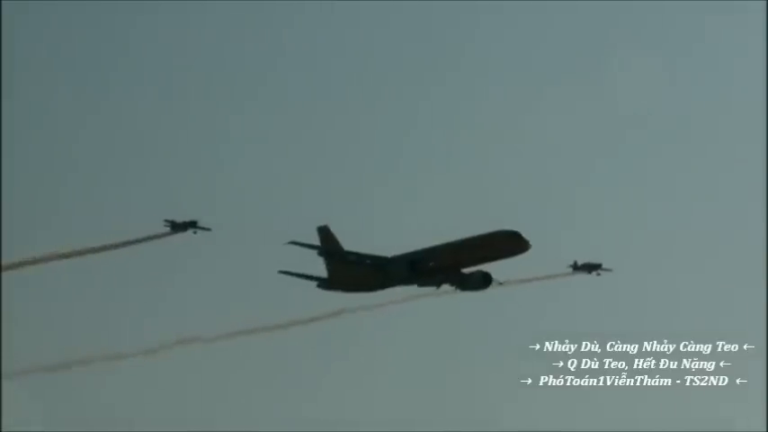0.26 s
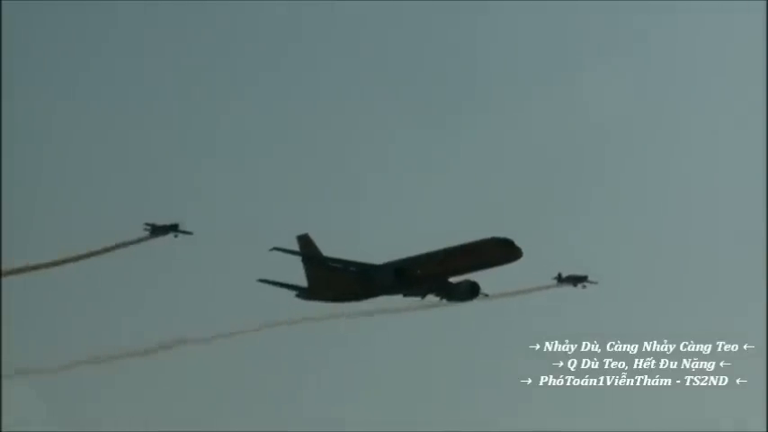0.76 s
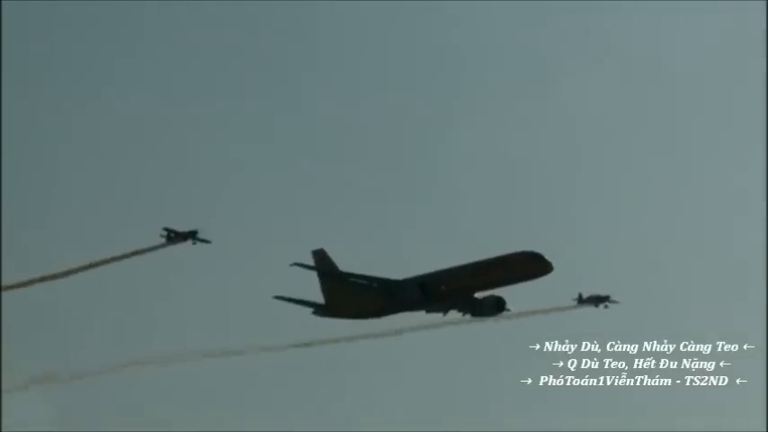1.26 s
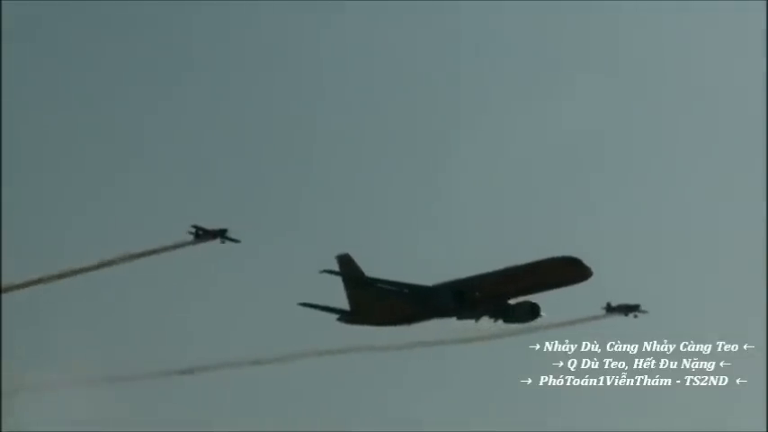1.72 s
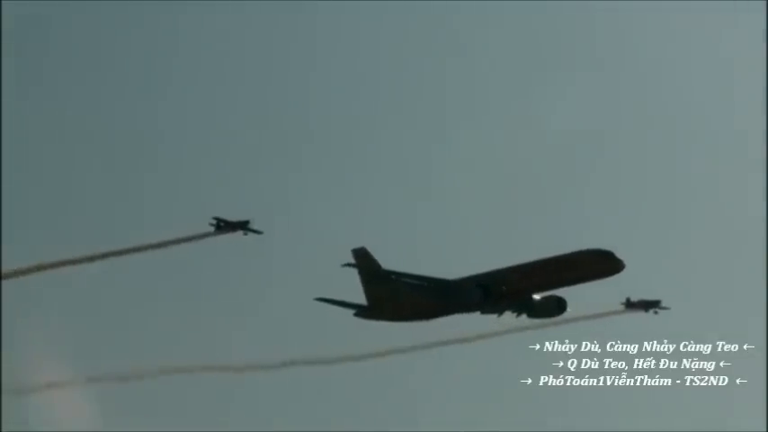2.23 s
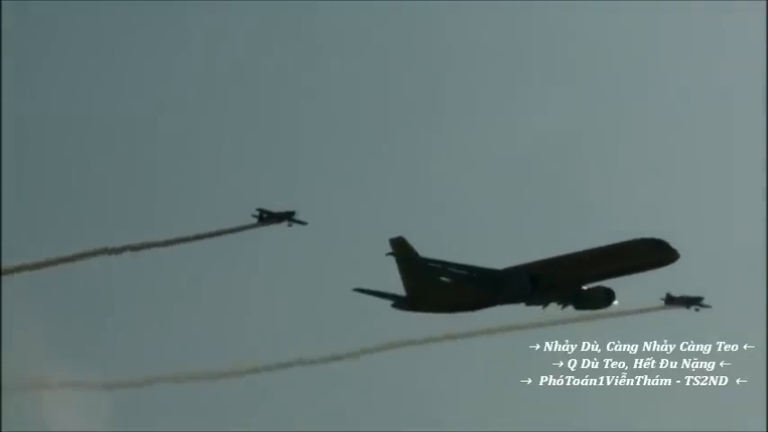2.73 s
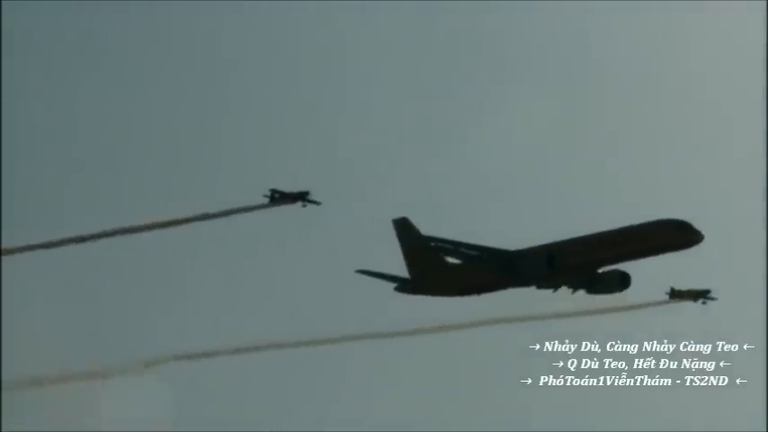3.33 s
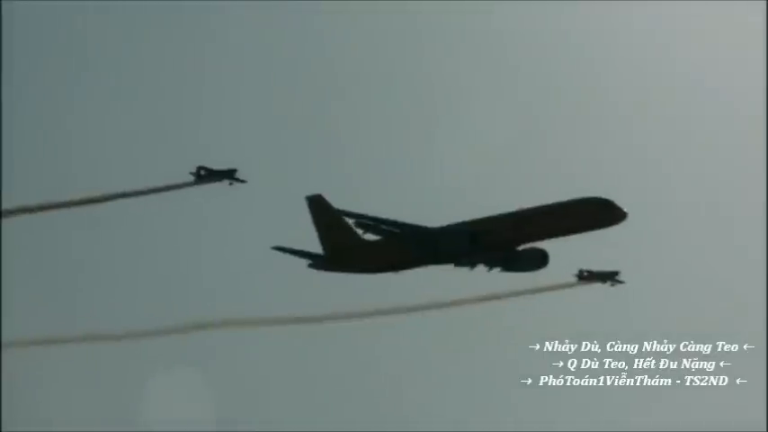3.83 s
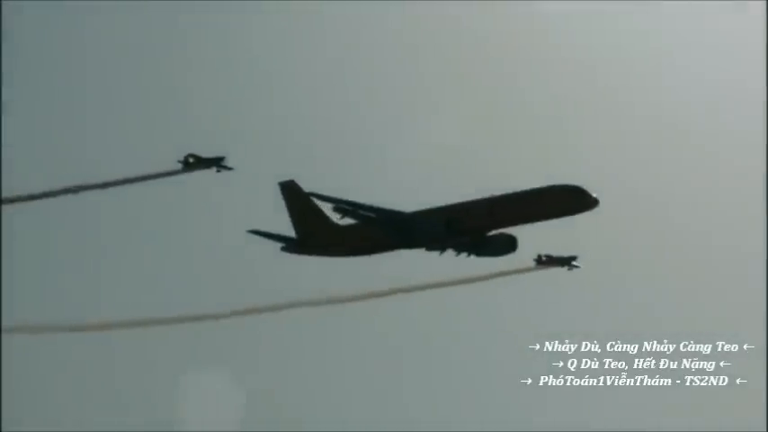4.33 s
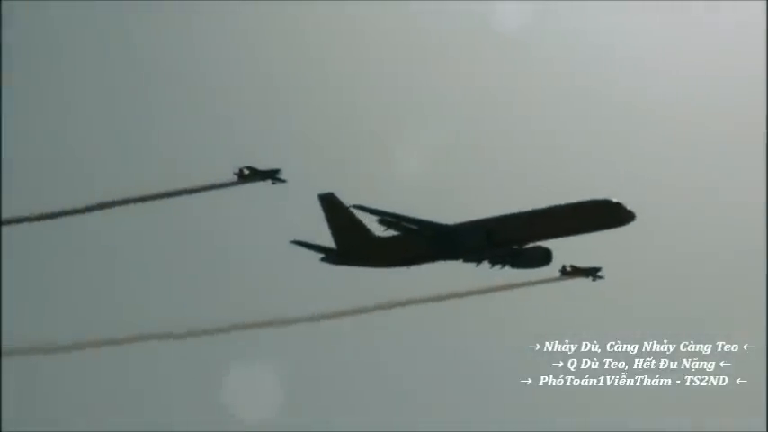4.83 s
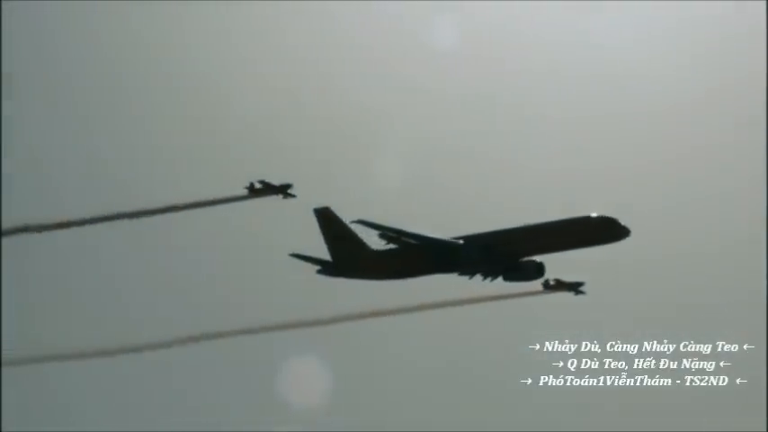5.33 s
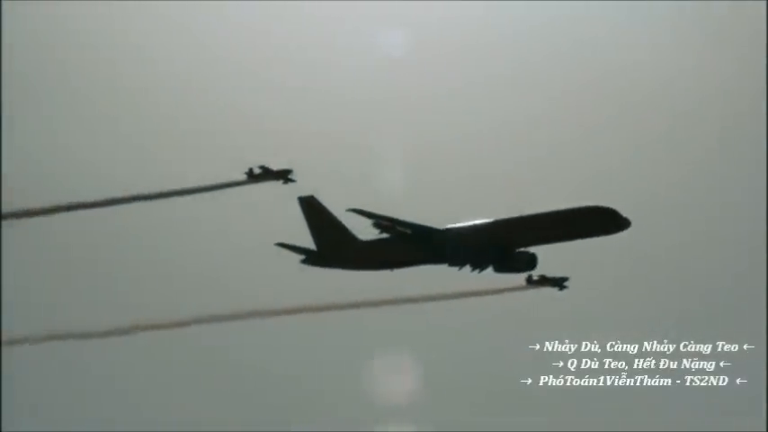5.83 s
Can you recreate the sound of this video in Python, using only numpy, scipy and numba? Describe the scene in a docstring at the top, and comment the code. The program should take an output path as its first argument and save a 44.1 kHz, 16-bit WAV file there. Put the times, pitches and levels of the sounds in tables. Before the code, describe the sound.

A close microphone aboard a flying plane catches gritty, uneven slipstream, strongest at first, with crackling hits in the first half second and sparse soft knocks. The boomy low end settles as faint pure turbine tones come forward. Then a hard cut brings a much fuller deep engine roar, hissing airflow that surges, soft low thumps, and two shrill wavering whines at steady pitch to the end.

```python
"""Aboard an aircraft in flight

Heard from aboard an aircraft in flight, so the turbine whines hold their pitch.
First the cabin booms; the slipstream, shaped noise and a moving howl, gusts and then eases off.
Eddies buffet the microphone into overload, small gust eddies knock, and faint turbine tones come forward.
The sound switches abruptly to a louder place aboard: a deep noise roar with low thumps, rushing air
and two piercing turbine whines, each a wandering tone in a noisy skirt."""
import sys
import numpy as np
from scipy import signal
from scipy.fft import rfft, irfft
from scipy.io import wavfile
from numba import njit

SR = 44100
rng = np.random.default_rng(int(sys.argv[2]) if len(sys.argv) > 2 else 0)


def wav_record(signal):
    """Record a signal, one row per channel, as 16-bit PCM in the file named by sys.argv[1]."""
    frames = np.transpose(np.atleast_2d(signal))
    bounded = np.clip(frames, -1, 1)
    # unit amplitude maps onto the largest positive 16-bit level
    quanta = np.round(bounded * 32767).astype(np.int16)
    wavfile.write(sys.argv[1], SR, quanta)


N = 267687
T = np.arange(N) / SR  # seconds
SWITCH_S = 4.611  # the second place takes over


def first_place():
    """A gusting slipstream and cabin boom over thin hiss and faint turbine tones."""
    return slipstream() + buffets() + cabin() + knocks() + engine()


# Gusts, which also shake the cabin. Each row: peak in seconds, half length in seconds,
# lift in dB of the slipstream, of its upper rush, of the cabin boom.
GUSTS = [(0.101, 0.032, 3.5, 3.3, -4), (0.167, 0.056, -4.5, 0.5, 1.5), (0.307, 0.035, 5.5, 3.3, 6),
         (0.359, 0.054, 3, 8.8, -2), (0.547, 0.15, 5, 2.3, 1), (0.772, 0.064, 3.5, 5, 2.5),
         (1.197, 0.15, 3, 4.9, 8), (1.493, 0.19, 1.5, 4.6, 4.5), (1.607, 0.049, 7, 0.33, -1.5),
         (1.847, 0.097, 8.5, 4.7, 1), (2.056, 0.08, 5, 3, 3), (2.277, 0.21, 8, 4.7, -2.5),
         (2.527, 0.035, 5.5, 3.3, -1.5), (2.767, 0.16, 3.5, 2.7, 0), (3.11, 0.049, 0, 1.3333, 0.5),
         (3.286, 0.059, 1.5, 3, -2.5), (3.494, 0.047, 6.5, 2.4, 4.5), (3.681, 0.16, 9, 3.2, -4.5),
         (4.026, 0.22, 4.5, 2.8, -0.5), (4.523, 0.26, 5, 6.5, 1)]
# Centre of the slipstream's howl. Each row: time in seconds, frequency in Hz.
HOWL_CENTRE = [(0, 670), (.55, 656), (1.2, 728), (2.1, 843), (2.6, 824), (3.3, 820), (3.7, 830), (4.2, 710),
               (4.5, 790)]
# Colour of the slipstream's dull body. Each row: frequency in Hz, relative level in dB per Hz.
SLIPSTREAM_COLOUR = [(220, -8.5), (330, -2), (420, 0), (520, 2), (620, 1.5), (760, -2), (900, -22)]
# Colour of its upper rush. Each row: frequency in Hz, relative level in dB per Hz.
RUSH_COLOUR = [(850, -1), (1000, 1.5), (1160, 6), (1400, 0.5), (1800, -3), (2200, -10), (3000, -16.5),
               (4200, -31), (7000, -51), (12000, -65)]
HOWL_DB, HOWL_PER_GUST = -2, 0.3  # howl over the body; gusts bring it out (dB per dB)
HOWL_WIDTH_HZ = 368  # of each resonator pass
HOLLOW_RATIO, HOLLOW_WIDTH_HZ, HOLLOW_DEPTH = 1.575, 186, 0.57  # centre relative to the howl
TEAR_DB, TEAR_HZ = 2.5, 130  # spread at the strongest moment; rate


def slipstream():
    """Turbulent air outside: a dull body, a hollow howl, an upper rush and grit, all gusting."""
    gust_db = sum(db * swell(s, half) for s, half, db, _, _ in GUSTS)
    slip_db = settle(calm_db=-45, excess_db=16.4, settling_s=0.93) + gust_db
    rush_gust_db = sum(db * swell(s, half) for s, half, _, db, _ in GUSTS)
    rush_db = settle(calm_db=-51, excess_db=12, settling_s=1) + rush_gust_db
    eddies_db = 1.54 * walk(27) + .5 * walk(7.8)  # shared by the body, howl and rush

    howl_hz, = controls(HOWL_CENTRE)
    howl = rng.standard_normal(N)
    for _ in range(3):  # three passes keep the howl's flanks steep
        howl = resonate(howl, howl_hz, HOWL_WIDTH_HZ)
    share = undb(HOWL_DB + HOWL_PER_GUST * gust_db)
    blend = (noise(SLIPSTREAM_COLOUR) + share * unit(howl)) / np.hypot(1, share)
    slip = blend * undb(slip_db + eddies_db)

    # stronger gusts tear the rush into deeper, uneven shreds
    tear_db = TEAR_DB * np.sqrt(undb(rush_db - rush_db.max())) * walk(TEAR_HZ)
    rush = noise(RUSH_COLOUR) * undb(rush_db + eddies_db + tear_db)
    # grit grows faster than the rush, so the strongest gusts crackle most
    grit_db = -44.0 + 1.34 * (rush_db + 37.5) + .5 * eddies_db
    rush = rush + grit(rate_hz=750, spread_db=2.7) * undb(grit_db)
    # a hollow in the rush moves along above the howl
    hollow = HOLLOW_DEPTH * resonate(rush, HOLLOW_RATIO * howl_hz, float(HOLLOW_WIDTH_HZ))
    return slip + rush - hollow


def grit(rate_hz, spread_db):
    """Tiny eddies of very uneven size that tick against the microphone."""
    hits = rng.random(N) < rate_hz / SR
    sizes_db = spread_db * np.minimum(rng.exponential(size=N), 3)
    ticks = hits * undb(sizes_db) * rng.choice([-1, 1], N)
    tick_colour = [(500, -19), (1200, 11.0), (2500, 2.0), (4200, -9.0), (7000, -28.0), (12000, -47)]
    return unit(colour(ticks, tick_colour))


# Eddies striking the microphone. Each row: centre in seconds, level in dB before each layer's
# own offset, sharpness from 0 to 1.
BUFFETS = [(0.0205, -33.5, 0.1), (0.068, -40, 0), (.083, -51, 0), (0.1001, -47, .3), (0.1095, -30.5, 0.4),
           (0.1150, -32.5, 0.7), (.134, -39, .05), (.144, -34.5, 0), (0.152, -37, .1), (0.1671, -39, .1),
           (0.1986, -35, 0.06), (.2183, -31, 0.6), (0.2591, -32, 0.5), (0.268, -32, 0),
           (0.2846, -33.5, .15), (0.299, -43, .05), (0.311, -39, .03), (.3200, -31.5, 0.3),
           (0.325, -37, .6), (.340, -24.5, 1), (0.3449, -28, 0.7), (0.349, -33, .05), (0.3551, -31, .4),
           (0.3660, -38, .1), (0.3706, -30, 0.4), (0.3845, -32, .8), (0.3877, -35, 0.6), (0.396, -42, .08),
           (.425, -40, .08), (.4288, -36, 0.85), (0.51, -40.5, .1)]


def buffets():
    """Each eddy shoves the microphone both ways; crackle rides between, and sharp ones spit treble."""
    shove, crackle, spit = np.zeros((3, N))
    for s, db, sharp in BUFFETS:
        age = T - s
        shove += undb(db + 20.5) * np.tanh(age / 0.00012) * np.exp(-np.abs(age) / 0.00049)
        crackle += undb(db - 1) * swell(s, 0.0016)
        spit += sharp * undb(db - 6.5) * swell(s, 0.0017)
    crackle *= noise([(700, 5.5), (2200, 8.0), (4500, -3), (7000, -31), (12000, -47)])
    spit *= noise([(2500, 5), (5000, 1), (8500, -8), (15500, -23)])
    return shove + crackle + spit


# Colour that feeds the cabin resonance. Each row: frequency in Hz, relative level in dB per Hz.
BOOM_COLOUR = [(20, -16), (35, -19), (55, -14), (90, -5.5), (135, 2), (200, 3.5), (290, 1.5), (370, -12),
               (470, -8.5), (620, -44)]
BOOM_HZ, BOOM_RISE_HZ = 208.7, 52.3
BOOM_RISE_S, BOOM_RISE_TAKES_S = 3.4, 0.18  # middle of the rise; its time constant


def cabin():
    """The cabin booms at one resonance, swayed by the gusts, over a steady rumble."""
    gust_db = sum(db * swell(s, half) for s, half, _, _, db in GUSTS)
    boom_db = settle(calm_db=-37, excess_db=8.5, settling_s=1.22) + gust_db
    # the resonance shifts up once
    risen = (1 + np.tanh((T - BOOM_RISE_S) / BOOM_RISE_TAKES_S)) / 2
    boom = unit(resonate(noise(BOOM_COLOUR), BOOM_HZ + BOOM_RISE_HZ * risen, 116.0))
    boom = boom * undb(boom_db + 1.16 * walk(12.0))
    rumble = noise([(18, -9), (40, -4), (80, 3.5), (130, 15.5), (400, 11.5), (520, -10.0)])
    return boom + rumble * undb(-45.5 + 0.49 * walk(8))


# Small knocks of gust eddies. Each row: start in seconds, level in dB before colouring,
# brightness from 0 to 1, decay of the rattle in seconds.
KNOCKS = [(0.193, -16, 0, .002), (0.613, -22, 0.22, 0.0055), (0.625, -16, 0.15, 0.0026),
          (0.917, -18.5, 0.06, 0.0018), (1.564, -18, 0, .002), (1.85, -20, 0.09, 0.0016),
          (2.023, -32, 0.2, 0.0054), (2.242, -21, 0, .002), (2.6163, -19.5, 0.3, 0.0013)]
# What each knock rings with. Each row: frequency in Hz, relative level in dB before
# colouring, decay in seconds.
KNOCK_MODES = [(230, -1, .005), (640, -1, .0017), (900, -7, .002), (1750, -15, .001)]


def knocks():
    """Small gust eddies knock: a few short, dull modes and a brief noisy rattle."""
    body, rattle = np.zeros((2, N))
    for s, db, bright, rattle_s in KNOCKS:
        age = np.maximum(T - s, 0)
        for hz, mode_db, decay_s in KNOCK_MODES:
            body += undb(db + mode_db) * np.sin(2 * np.pi * hz * age) * np.exp(-age / decay_s)
        rattle += bright * undb(db) * (T >= s) * np.exp(-age / rattle_s)
    body = colour(body, [(70, -25), (130, 1), (200, -3), (2500, -4.0), (5000, -15)])
    rattle_colour = [(600, 4), (1600, 10.5), (2400, 4.5), (4000, -1), (5500, -16), (9000, -33)]
    return body + colour(rattle * rng.standard_normal(N), rattle_colour)


# Colour of the engine hiss. Each row: frequency in Hz, relative level in dB per Hz.
HISS_COLOUR = [(1500, 0), (3100, -5), (3780, 0.5), (4400, -3.5), (5600, -3.5), (7450, -5.5), (7800, -2.5),
               (8080, 0.5), (8450, -9), (9700, -17), (11600, -16.5), (12150, -9.5), (12700, -39),
               (15500, -23)]
# Main turbine tone. Each row: time in seconds, level in dB.
TURBINE_LEVEL = [(0, -63), (1.05, -73), (1.5, -68.5), (2.15, -69), (2.5, -64.5), (2.8, -60.5), (3.3, -63),
                 (3.65, -66), (4.15, -62.5), (4.56, -56.5)]
# Breathy halo that turbulence spreads around it. Each row: frequency in Hz, relative level in dB per Hz.
TURBINE_HALO = [(3250, -19), (3500, -2), (3700, -1.5), (3820, -12), (4000, -18)]
# Low fan tone, coming forward. Each row: time in seconds, level in dB.
FAN_LEVEL = [(0, -73), (1.8, -69), (2.3, -62), (4.15, -61.5), (4.56, -52)]
# Gearbox tone that comes forward, recedes and returns. Each row: time in seconds, level in dB.
GEAR_LEVEL = [(0, -79), (1.2, -78), (1.6, -74), (2.4, -70), (2.8, -79), (3.4, -76), (3.8, -80), (4.56, -70)]
# Swelling and sinking of the high whistle. Each row: peak in seconds, lift in dB.
HIGH_SWELLS = [(.9, -6), (1.23, 2), (1.39, -4), (1.5, 0), (1.74, -3), (1.88, 3), (2.14, 8), (2.68, 3),
               (2.86, 3.5), (3.0, -9), (3.12, 4), (3.23, -7), (3.33, 7.5), (3.45, 5.5), (3.8, -10),
               (3.9, 6.5), (4.07, 5), (4.24, -6), (4.35, 3), (4.5, 7)]
# Weaker turbine and gearbox tones. Each row: frequency in Hz, level at the start in dB,
# rise in dB per second.
FAR_TONES = [(4075, -91, 5.3), (4700, -80.5, 0.7), (4748, -82.5, 1), (4802, -89, 2.4), (5542, -92, 3),
             (5577, -82.5, 1.3), (5938, -91, 2), (7122, -88, 1), (12145, -92, 2.3)]
TURBINE_HZ, FAN_HZ, GEAR_HZ, HIGH_TONE_HZ = 3758, 1895, 4210, 8096
HALO_DB = -6.5  # relative to the turbine tone
HIGH_SWELL_HALF_S = 0.065


def engine():
    """Thin, growing hiss and faint rotor tones, each wavering by itself."""
    hiss = noise(HISS_COLOUR) * undb(grow(-67, 2.16) + .5 * walk(11))

    turbine_db, = controls(TURBINE_LEVEL)
    turbine = whine(TURBINE_HZ, wander_hz=3.5, scatter=0.42, skirt_hz=55)
    turbine = undb(turbine_db) * (turbine + undb(HALO_DB) * noise(TURBINE_HALO))
    fan_db, = controls(FAN_LEVEL)
    fan = undb(fan_db) * whine(FAN_HZ, wander_hz=2.5, scatter=0.29, skirt_hz=35)
    gear_db, = controls(GEAR_LEVEL)
    gear = undb(gear_db) * whine(GEAR_HZ, wander_hz=1.5, scatter=0.31, skirt_hz=18)

    high_db = grow(-70, 0.89) + sum(db * swell(s, HIGH_SWELL_HALF_S) for s, db in HIGH_SWELLS)
    high = whine(HIGH_TONE_HZ, wander_hz=1.36, scatter=0.26, skirt_hz=14)
    high = high * undb(high_db + 1.0 * walk(9))

    far = np.zeros(N)
    for hz, start_db, rise in FAR_TONES:
        tone = whine(hz, wander_hz=2.17, scatter=0.24, skirt_hz=21)
        far += tone * undb(grow(start_db, rise) + 2.6 * walk(3.7))
    return hiss + turbine + fan + gear + high + far


def second_place():
    """Deep airframe roar with low buffeting, rushing air, and piercing compressor whines."""
    return roar() + compressors() + rushing_air() + buffeting() + spray() + shafts()


# Colour of the airframe roar. Each row: frequency in Hz, relative level in dB per Hz.
ROAR_COLOUR = [(60, -46), (125, -10.5), (190, -2), (235, 2), (300, -1.5), (355, -5), (435, -3.5),
               (600, -17), (800, -21), (1150, -23.5), (1450, -31), (1650, -27.5), (2100, -44)]
ROAR_DB, ROAR_BUILD_DB_PER_S = -26.5, 1.6  # level at the switch; slow build


def roar():
    """Deep airframe roar: low noise that builds slowly and flutters."""
    level_db = ROAR_DB + ROAR_BUILD_DB_PER_S * (T - SWITCH_S)
    return noise(ROAR_COLOUR) * undb(level_db + 1.24 * walk(37))


# Two compressor whines. Each row: time in seconds, lower whine in dB before a fixed 1 dB lift,
# upper whine in dB.
WHINES = [(4.61, -50.5, -46), (4.79, -41, -46.5), (4.9, -43.5, -52), (5.1, -36, -41), (5.2, -39, -46),
          (5.32, -38.5, -45), (5.39, -52, -41), (5.48, -42.5, -64), (5.56, -54, -48), (5.68, -38.5, -46),
          (5.78, -45, -42), (5.84, -41, -52), (5.89, -55, -43.5), (5.97, -42, -40.5), (6.07, -54, -40)]
LOWER_WHINE_HZ, UPPER_WHINE_HZ = 6158, 7112


def compressors():
    """Compressor blades cut the air at two steady rates, each with a faint octave."""
    lower_db, upper_db = controls(WHINES)
    lower = whine(LOWER_WHINE_HZ, wander_hz=3.63, scatter=0.53, skirt_hz=55, octave_db=-25)
    upper = whine(UPPER_WHINE_HZ, wander_hz=3.2, scatter=1.0, skirt_hz=100, octave_db=-28)
    lower = lower * undb(lower_db + 1.0 + 0.7 * walk(11))
    return lower + upper * undb(upper_db + 1.2 * walk(16))


# Colour of the rushing air. Each row: frequency in Hz, relative level in dB per Hz.
AIR_COLOUR = [(900, -12.5), (1500, -7), (2000, -8), (2300, -2), (2580, 3.5), (2900, -6.5), (3800, -10.5),
              (5500, -12), (7150, -12.5), (8200, -26), (10000, -34), (12350, -26), (12650, -35),
              (15500, -52)]
# Short surges of the edge tone. Each row: peak in seconds, half length in seconds, lift in dB,
# pitch rise in Hz.
SURGES = [(4.68, 0.11, 3, 0), (5.075, 0.05, 4, 50), (5.303, 0.14, 2, 350), (5.6, 0.068, -0.5, 500),
          (5.773, 0.14, 1, 250), (5.96, 0.029, 6, 250)]
AIR_DB, AIR_BUILD_DB_PER_S = -37, 1.6  # level at the switch; build
AIR_FADES_S, AIR_FADE_DB_PER_S = 5.74, 18.5


def rushing_air():
    """Air rushes through a duct resonance; surges shift a breathy edge tone in pitch and level."""
    air_db = AIR_DB + AIR_BUILD_DB_PER_S * (T - SWITCH_S)
    air_db -= AIR_FADE_DB_PER_S * np.maximum(T - AIR_FADES_S, 0)
    air = noise(AIR_COLOUR) * undb(air_db + 1.0 * walk(50))

    surge_hz = sum(hz * swell(s, half) for s, half, _, hz in SURGES)
    surge_db = sum(db * swell(s, half) for s, half, db, _ in SURGES)
    edge_hz = (2520 + surge_hz) * (1 + 0.04 * walk(15))
    breath = noise([(1800, -3), (2400, 0.5), (3600, -2.5), (6000, -5)])
    edge = unit(resonate(breath, edge_hz, 480.0))
    return air + edge * undb(air_db - 5.5 + surge_db + 3.1 * walk(22))


# Low thumps of turbulence. Each row: peak in seconds, lift in dB.
THUMPS = [(5.0, 8), (5.085, 10), (5.22, 19), (5.496, 14.5), (5.6, 6), (5.75, 13), (5.82, 12), (6.0, 12)]
BUFFETING_DB, THUMP_HALF_S = -44, 0.037  # level between thumps; half length of each


def buffeting():
    """Turbulence rumbles at low level and thumps in short swells."""
    level_db = BUFFETING_DB + sum(db * swell(s, THUMP_HALF_S) for s, db in THUMPS)
    rumble = noise([(12, -11), (30, -1.5), (65, -1.5), (115, 3.5), (170, -6)])
    return rumble * undb(level_db + 2.0 * walk(23))


def spray():
    """Fine high noise that swells once as the airflow quickens and slackens."""
    quicken = swell(peak_s=5.49, half_s=0.45)
    fine = noise([(6500, -9), (8000, 6), (10000, -1.5), (12300, -8), (12650, -26)])
    return fine * undb(-59.5 + 9.9 * quicken + 1.0 * walk(6.5))


# Weaker shaft tones. Each row: frequency in Hz, level in dB.
NEAR_TONES = [(2535, -53), (3384, -58), (4240, -63), (5118, -66), (5311, -66), (5653, -66), (5886, -58)]


def shafts():
    """Steady faint tones of the turning shafts, blurred by turbulence."""
    return sum(undb(db) * whine(hz, wander_hz=3.87, scatter=0.55, skirt_hz=35)
               for hz, db in NEAR_TONES)


def whine(hz, wander_hz, scatter, skirt_hz, octave_db=-np.inf):
    """A blade tone and its octave; turbulence scatters part of each into a noisy skirt."""
    phase = 2 * np.pi * np.cumsum(hz + wander_hz * walk(7.4)) / SR
    shimmer = 1 + scatter * (walk(skirt_hz) + 1j * walk(skirt_hz))
    tones = np.exp(1j * phase) + undb(octave_db) * np.exp(2j * phase)
    return unit(np.imag(shimmer * tones))


@njit
def resonate(x, hz, width):
    """State-variable band-pass whose centre moves, with unit gain there; width in Hz."""
    y, band, low = np.empty(len(x)), 0., 0.
    for i in range(len(x)):
        g, k = np.tan(np.pi * hz[i] / SR), width / hz[i]
        v = (band + g * (x[i] - low)) / (1 + g * (g + k))
        band, low, y[i] = 2 * v - band, low + 2 * g * v, k * v
    return y


def noise(points):
    """Noise of a given spectrum, rms 1."""
    return unit(colour(rng.standard_normal(N), points))


def colour(x, points):
    """Filter by a spectrum of (Hz, dB) points that falls 20 dB per octave beyond its ends."""
    hz, db = np.transpose(points)
    octaves = np.log2(np.maximum(np.arange(N // 2 + 1) * SR / N, 1))
    below = np.maximum(np.log2(hz[0]) - octaves, 0)
    above = np.maximum(octaves - np.log2(hz[-1]), 0)
    gain_db = np.interp(octaves, np.log2(hz), db) - 20 * (below + above)
    return irfft(rfft(x) * undb(gain_db), N)


def walk(rate_hz):
    """Smooth chance with spread 1, moving up to about rate_hz times a second."""
    f = np.arange(N // 2 + 1) * SR / N
    return unit(irfft(rfft(rng.standard_normal(N)) / (1 + (f / rate_hz) ** 2), N))


def swell(peak_s, half_s):
    """A smooth rise to 1 and fall back."""
    return np.exp(-((T - peak_s) / half_s) ** 2)


def settle(calm_db, excess_db, settling_s):
    """A level in dB that starts high and eases down to its calm value."""
    return calm_db + excess_db * swell(0, settling_s)


def grow(start_db, db_per_s):
    """A level in dB that climbs steadily."""
    return start_db + db_per_s * T


def controls(table):
    """One curve per column after the time, joined by straight lines."""
    s, *columns = np.transpose(table)
    return [np.interp(T, s, c) for c in columns]


def undb(db):
    """Decibels to gain."""
    return 10 ** (np.asarray(db) / 20)


def unit(x):
    """Scale to rms 1."""
    return x / np.sqrt(np.mean(np.abs(x) ** 2))


def scene():
    """One place gives way to the other within a few milliseconds."""
    second = np.clip((T - SWITCH_S) / 0.0029 + .5, 0, 1)
    mix = (1 - second) * first_place() + second * second_place()
    return mix[None]


def record(dry):
    """The microphone flattens the highest peaks; a steep low-pass cuts the top."""
    ceiling, top_hz = 0.16, 15800
    flattened = dry / (1 + (dry / ceiling) ** 10) ** (1 / 10)
    low_pass = signal.ellip(8, .2, 70, top_hz, fs=SR, output="sos")
    return signal.sosfilt(low_pass, flattened)


dry = scene()
out = record(dry)
wav_record(out)
```